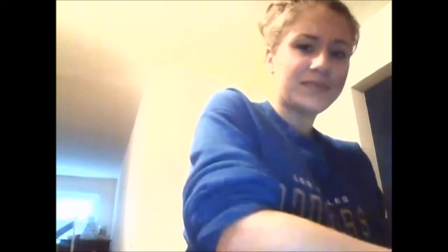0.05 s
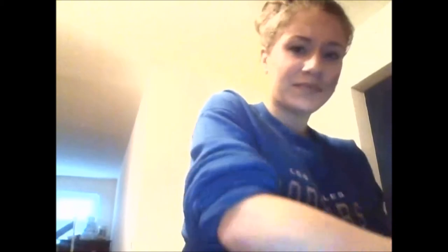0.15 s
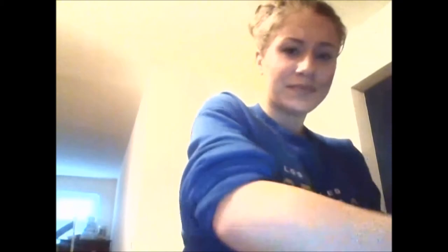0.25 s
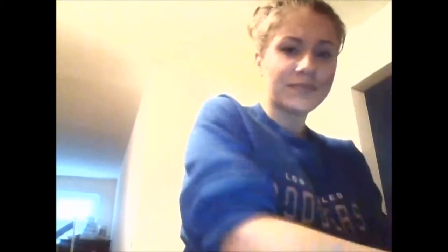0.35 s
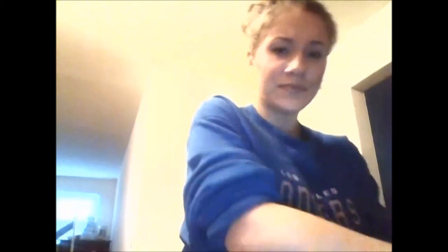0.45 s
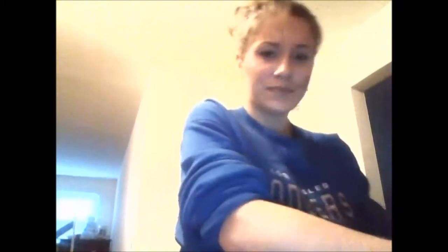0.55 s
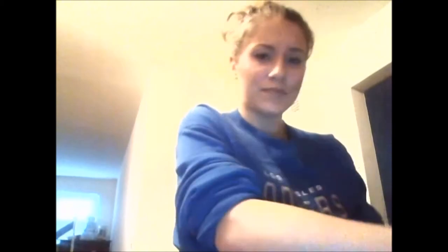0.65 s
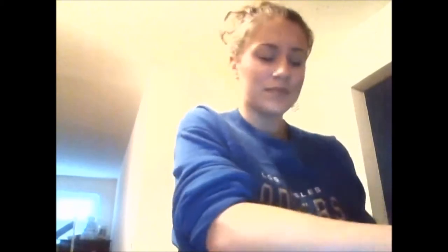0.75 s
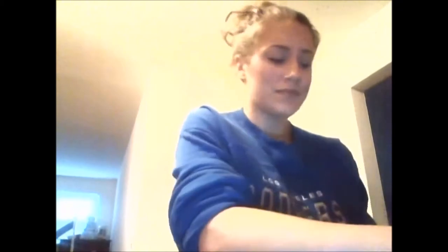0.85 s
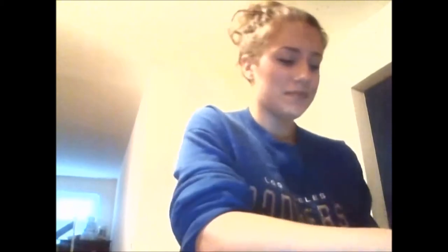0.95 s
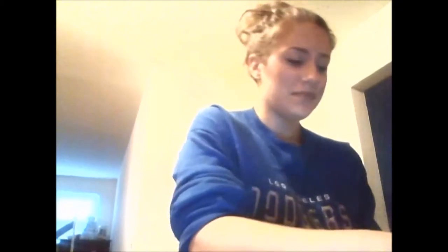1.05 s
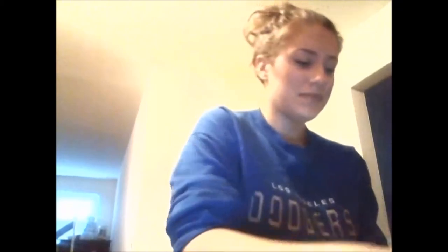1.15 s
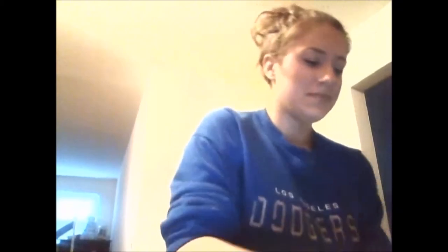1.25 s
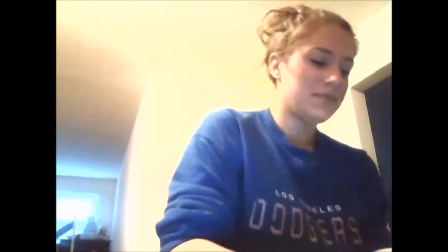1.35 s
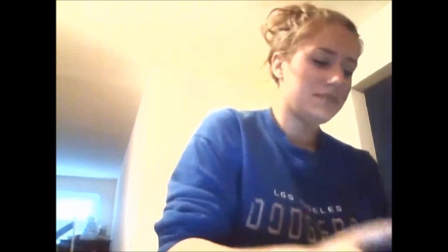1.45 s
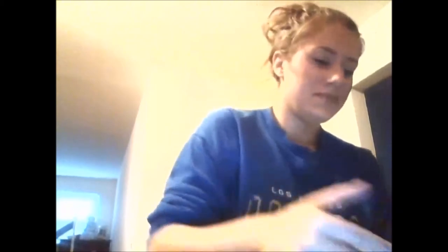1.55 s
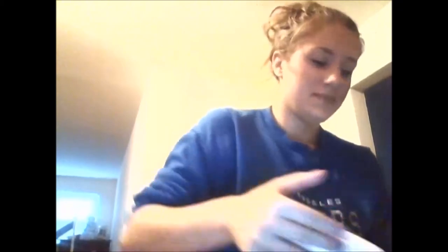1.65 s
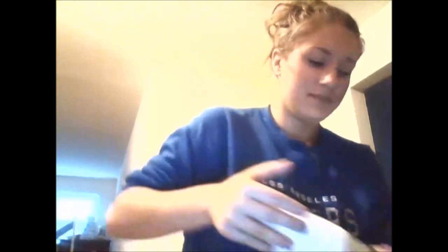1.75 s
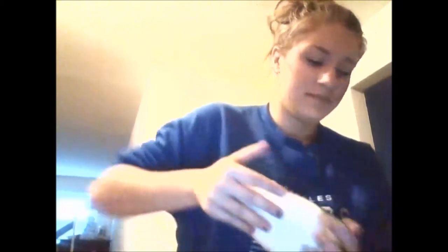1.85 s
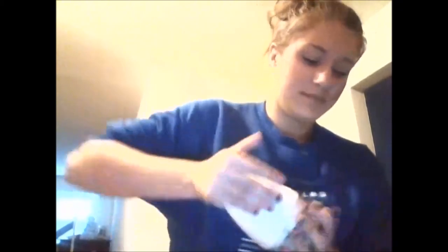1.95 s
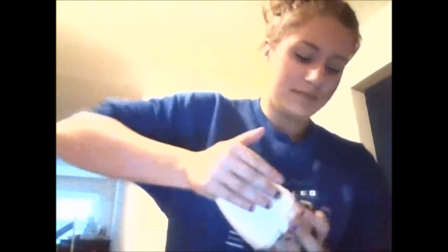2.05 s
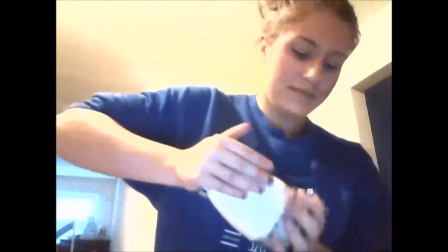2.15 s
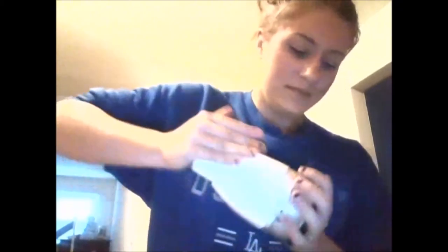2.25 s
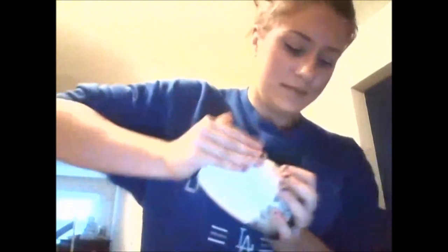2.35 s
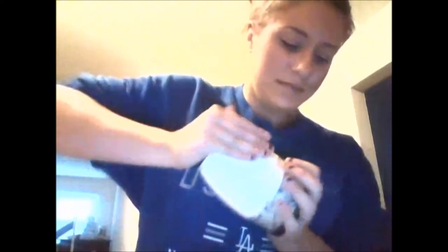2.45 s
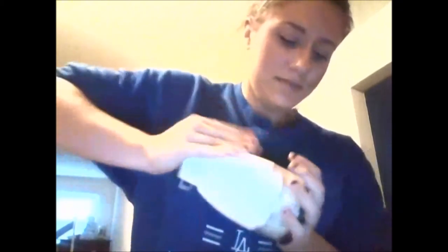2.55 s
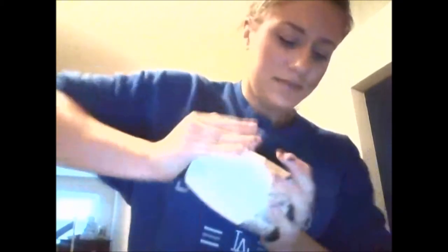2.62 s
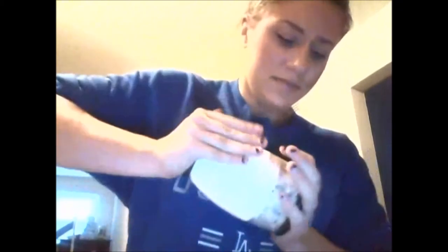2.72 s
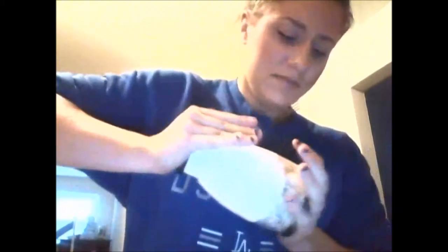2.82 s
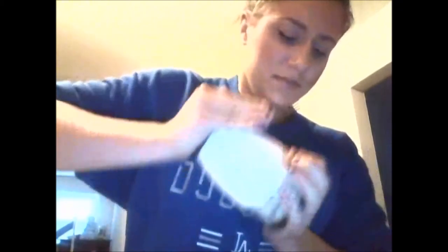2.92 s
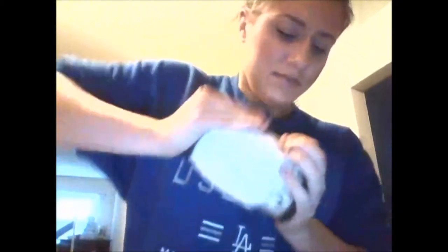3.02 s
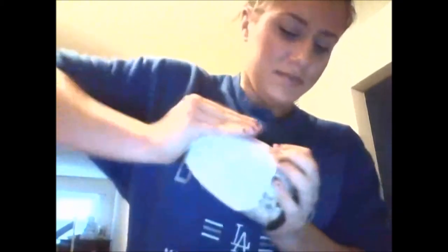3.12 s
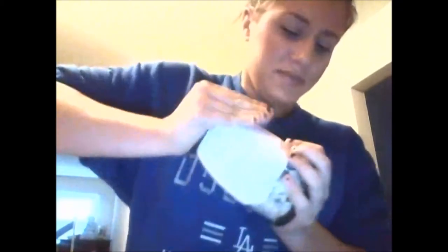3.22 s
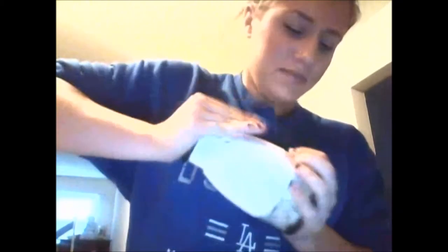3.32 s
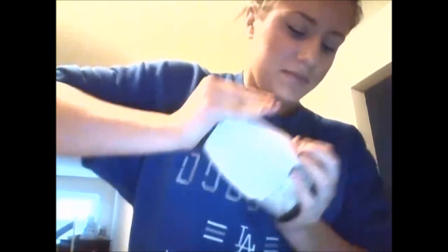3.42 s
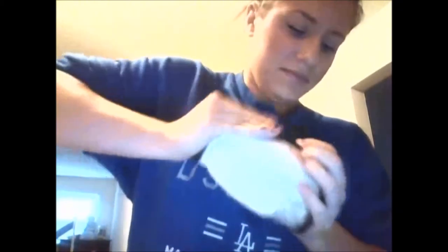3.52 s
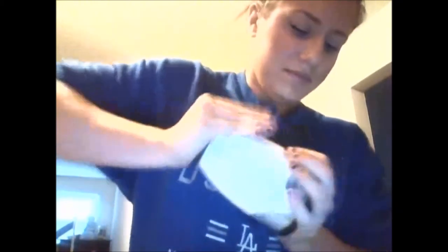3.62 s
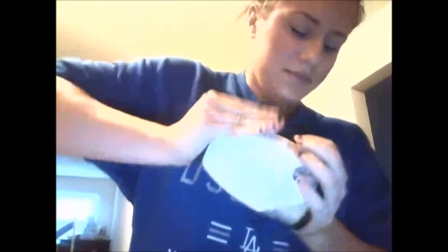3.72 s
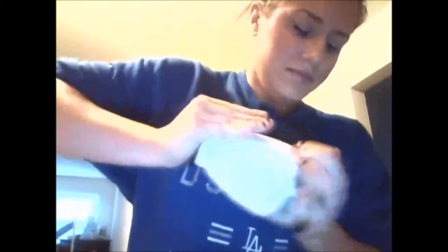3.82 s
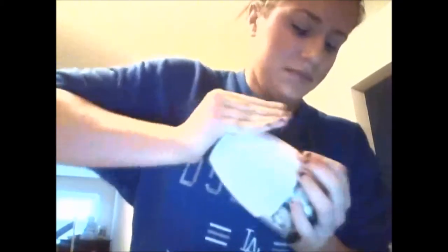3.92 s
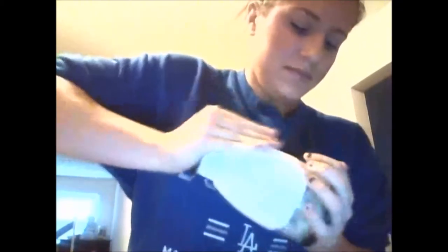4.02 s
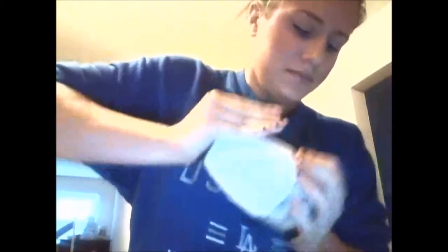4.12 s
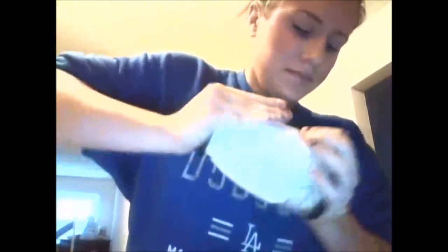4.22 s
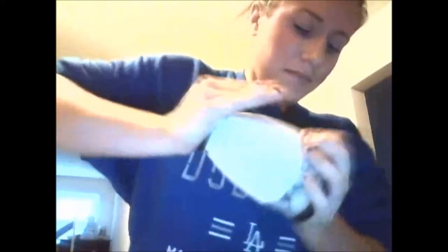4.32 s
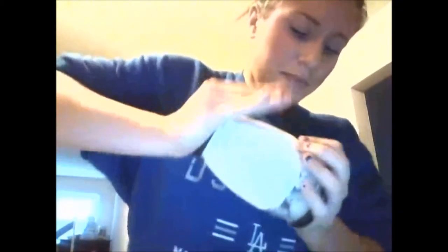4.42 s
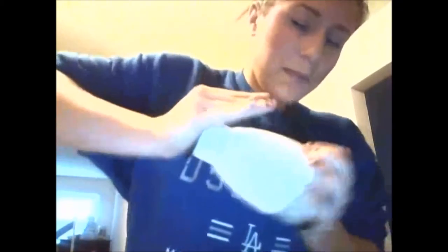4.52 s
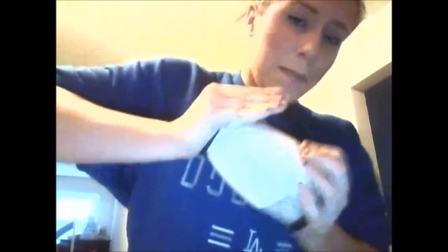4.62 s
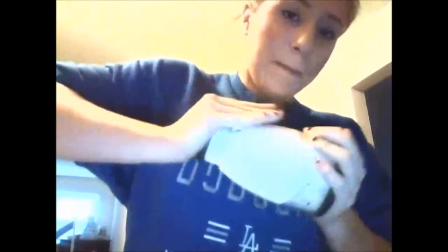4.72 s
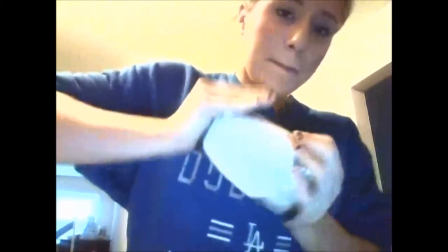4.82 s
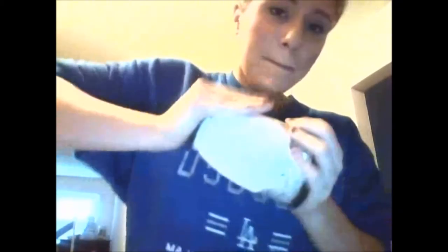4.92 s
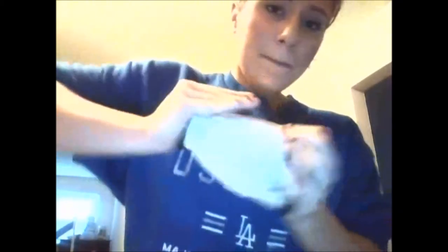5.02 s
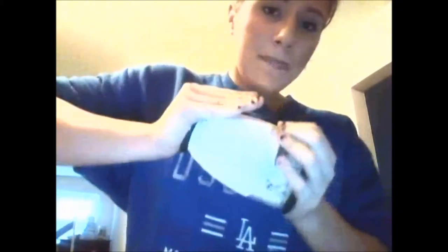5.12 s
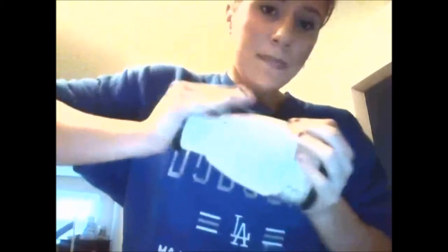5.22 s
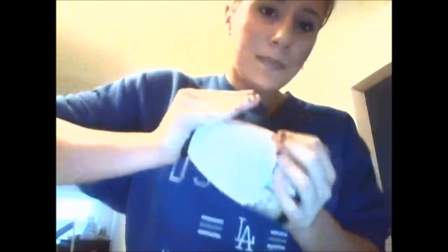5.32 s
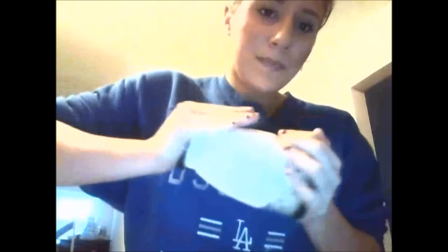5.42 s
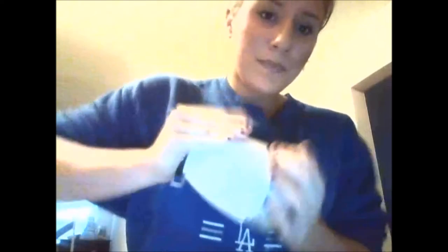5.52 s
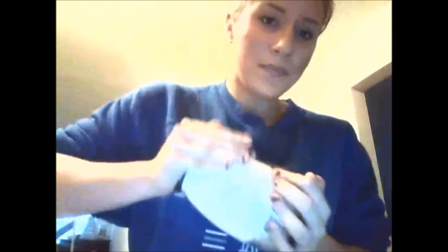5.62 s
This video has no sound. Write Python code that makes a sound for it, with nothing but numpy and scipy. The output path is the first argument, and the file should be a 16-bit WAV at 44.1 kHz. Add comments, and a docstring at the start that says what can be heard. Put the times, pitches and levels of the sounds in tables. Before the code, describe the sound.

A hollow plastic hand chopper is set down, slid closer, then pumped quickly in runs of rattling clacks and gritty scrapes.

```python
"""Vegetable chopper in a small kitchen

A hollow plastic hand chopper is set down, slid to hand and pumped close to the microphone.
Each stroke is a run of chattering clacks that ring shell, head and blades and boom in the cup,
over the gritty scrape of the plunger; twice the palm lands with a thump. A short room tail
answers, and mains hum, faint hiss and a few low counter bumps lie underneath."""
import sys
import numpy as np
from scipy import signal
from scipy.fft import rfft, irfft
from scipy.io import wavfile
from scipy.ndimage import uniform_filter1d

SR = 44100
rng = np.random.default_rng(int(sys.argv[2]) if len(sys.argv) > 2 else 0)


def transcribe(u):
    """Save the signal u as a 16-bit wav file named by the first command-line argument.

    u: samples, shape (n,) or (channels, n), limited to [-1, 1]; the rate is SR.
    q: integer samples, one column per channel.
    """
    v = np.clip(np.atleast_2d(u).T, -1, 1)
    q = np.round(v * 32767).astype(np.int16)
    wavfile.write(sys.argv[1], SR, q)


N = 250047

# colour of the noise floor: (frequency [Hz], relative level [dB])
HISS_SPECTRUM = [(50, -11), (170, -11.5), (280, -26.5), (500, -18), (2000, -51.5), (5000, -35),
                 (15500, -56)]
# low bumps on the counter: (time [s], hold [s], level [dB])
COUNTER_BUMPS = [(0, 0.01, -40), (.3, 0.075, -41), (.72, 0.016, -63)]
# decay of the kitchen: (frequency [Hz], t60 [s])
ROOM_DECAY = [(300, 0.33), (2000, 0.38), (10000, 0.28)]
# bright onset of the slide: (time [s], hold [s], level [dB])
SWISH_SWELL = [(1.21, 0.011, -57)]
# narrow-band tail of the slide: (time [s], hold [s], level [dB])
SLIDE_SWELL = [(1.3, 0.098, -69.5)]
# friction resonances of the slide: (frequency [Hz], width [Hz], level [dB])
SLIDE_MODES = [(4920, 630, 4), (9200, 940, -16)]
# plastic shell: (frequency [Hz], width [Hz], level [dB])
SHELL_MODES = [(1430, 260, -4), (2030, 1370, 0), (2822, 125, -3.5), (3840, 1640, -7)]
# snap of the blades: (frequency [Hz], width [Hz], level [dB])
BLADE_MODES = [(6000, 2060, 10), (8350, 2030, 5), (10200, 6700, -3)]
# boom of the cup's air and wall: (frequency [Hz], width [Hz], level [dB])
CUP_MODES = [(316, 24.8, 10), (401, 100, 1)]
# hollow knock of the plunger head: (frequency [Hz], width [Hz], level [dB])
HEAD_MODES = [(544, 200, -2), (937, 170, 18.5)]
# one rub inside the cup for each movement: (time [s], hold [s], level [dB])
PLUNGER_RUBS = [(0, 0.002, -35.5), (.31, 0.066, -42.5), (.5, 0.3, -63.5), (1.67, 0.056, -67.5),
                (1.93, 0.008, -46.5), (2.3, 0.051, -46), (2.59, 0.12, -59), (2.88, 0.068, -53.5),
                (3.12, 0.024, -48.5), (3.36, 0.02, -45), (3.53, 0.017, -55), (3.62, 0.012, -52.5),
                (3.86, 0.0047, -48), (4.07, 0.04, -50.5), (4.32, 0.003, -43), (4.55, 0.0053, -43),
                (4.79, 0.014, -48.5), (5.04, 0.0057, -50), (5.27, 0.0024, -47.5), (5.51, 0.0017, -44.5)]
# palm blows as the plunger bottoms out: (time [s], level [dB], pitch [Hz])
PALM_BLOWS = [(3.382, -17.5, 443), (3.868, -24, 587)]
# hits inside the chopper: (time [s], level [dB], cup boom trim [dB], head knock trim [dB],
# blade snap trim [dB], chatter t60 [s])
CLACK_HITS = [(0.251, -23.5, -12, -8, -8, 0.038), (0.291, -13, -22, -3.5, -14, 0.05),
              (0.364, -27, 2, -10, -9.5, 0.089), (0.404, -37, -21, -19, 3, 0.034),
              (0.502, -35.5, -36, -30, -14.5, 0.12), (0.602, -22, -44, -56, 2, 0.028),
              (0.703, -28.5, -40, 3, -9, 0.068), (1.207, -44.5, 21, 17, -28, 0.0084),
              (1.226, -39, -55, -27, -17.5, 0.033), (1.3, -40.5, -12, -36, -50, 0.04),
              (1.337, -42.5, -33, 6, -1, 0.017), (1.392, -45.5, -32, -14, -26, 0.041),
              (1.502, -45.5, -8, -11, -38, 0.035), (1.577, -31, 2.5, -2, -27, 0.023),
              (1.623, -43, -7, -20, -26, 0.026), (1.754, -42, 3, -14, -18, 0.046),
              (1.913, -29, -17.5, -19, -14, 0.039), (1.979, -32.5, 0, -31, -16.5, 0.13),
              (2.103, -36, -55, -43, -20.5, 0.019), (2.237, -23.5, -43, 0.5, -9.5, 0.053),
              (2.287, -25.5, -2, -7, -22, 0.027), (2.331, -27, -33, -15, -13, 0.047),
              (2.348, -24, -8, -15, -24, 0.083), (2.388, -32, -46, -25, -14, 0.042),
              (2.502, -34, -21, -8, -30, 0.21), (2.525, -31, 9, -24, -11, 0.039),
              (2.598, -26, -37, -29, -13, 0.025), (2.608, -22.5, -30, -9, -5, 0.1),
              (2.624, -21, -2, -26, -15.5, 0.043), (2.718, -36.5, -29, -20, -1, 0.019),
              (2.763, -36, -4.5, -9, -15, 0.17), (2.851, -30.5, -29, -20, -11, 0.087),
              (2.868, -24, -1.5, 2.5, -21, 0.092), (2.879, -13, -6.5, -8, -12.5, 0.033),
              (3.033, -36, -23, -6.5, -16, 0.047), (3.047, -33, 4.5, -12, -12, 0.072),
              (3.117, -26, -44, -39, -27, 0.016), (3.13, -23.5, -22, 13, 7, 0.057),
              (3.145, -21.5, -19, -22, -20, 0.034), (3.256, -38.5, -30, -20, -2, 0.015),
              (3.292, -30, -30, -8, -19, 0.094), (3.313, -22, -17, 6.5, -2.5, 0.051),
              (3.358, -27.5, -24, 0, -25, 0.0094), (3.363, -26, -33, -37, -20, 0.13),
              (3.381, -14.5, -33, -5.5, -8.5, 0.041), (3.412, -26, -27, -18, 13, 0.017),
              (3.489, -37, -25, -31, -6, 0.019), (3.518, -36.5, -23, -15, 2, 0.015),
              (3.524, -28.5, -9, -5.5, -19.5, 0.11), (3.598, -34.5, -32, -2, -41, 0.042),
              (3.614, -22.5, -46, 1, -4, 0.029), (3.628, -17, -40, -4.5, -10, 0.031),
              (3.745, -37.5, 2, -3, 1, 0.032), (3.787, -19.5, -5, -11, -18, 0.059),
              (3.84, -33, -33, -1, -37, 0.042), (3.859, -22.5, -10.5, -19, -10.5, 0.095),
              (3.885, -27.5, -5, -5, -11, 0.037), (3.975, -31.5, -49, -24, 12, 0.028),
              (3.993, -34.5, -10, -15, -19, 0.12), (4.008, -25.5, -29, -31, -16, 0.051),
              (4.07, -20.5, -51, -48, -23.5, 0.035), (4.085, -25, -12, -6, -9, 0.059),
              (4.1, -24.5, 0.5, 3.5, -10.5, 0.042), (4.234, -23.5, -1.5, -35, -14.5, 0.031),
              (4.309, -22, -7, -45, -13.5, 0.033), (4.343, -24.5, -6, -34, -18, 0.025),
              (4.452, -40, -26, -18, -26, 0.079), (4.478, -24.5, -2.5, -14, -12, 0.051),
              (4.523, -15.5, -1.5, -17, -10, 0.035), (4.552, -22, -14, -16, -11, 0.049),
              (4.567, -26.5, -20, -14, -15, 0.044), (4.576, -22.5, 1.5, -24, -19, 0.053),
              (4.728, -29, -7, -1.5, -17, 0.082), (4.778, -30.5, -30, -14, -22, 0.039),
              (4.794, -24.5, -20, -24, -14, 0.032), (4.809, -28.5, 0, -5, -15, 0.057),
              (4.935, -37, -12, -34, -5, 0.033), (4.956, -27.5, -18, 2.5, -27, 0.036),
              (4.99, -36.5, -33, -18, -24, 0.036), (5.023, -38, -4, -5, -32, 0.09),
              (5.048, -23, -32, -22, -21.5, 0.036), (5.059, -24.5, -22, -27, -18, 0.055),
              (5.197, -27, -1, -5, -9, 0.069), (5.251, -27.5, 2, -14, -15.5, 0.062),
              (5.288, -28, -12, -29, -13, 0.096), (5.303, -25.5, -3.5, -37, -26, 0.038),
              (5.42, -35.5, 6, -12, -12.5, 0.04), (5.487, -26, 4, 1, -20, 0.072),
              (5.502, -22, -46, -39, -19, 0.025), (5.532, -25, 2.5, -32, -12, 0.03),
              (5.657, -31.5, -30, -30, -20, 0.46)]
# treble roll-off of the microphone: (frequency [Hz], gain [dB])
MIC_RESPONSE = [(7000, 0.5), (11000, -4.5), (14000, -14)]


def gain_of(db):
    return 10 ** (np.asarray(db) / 20)


def unit_rms(x):
    return x / np.sqrt(np.mean(x ** 2) + 1e-20)


def unit_peak(x):
    return x / (abs(x).max() + 1e-20)


def unit_energy(x):
    return x / np.linalg.norm(x)


def curve_at(points, hz):
    """Reads a curve on a log-frequency axis."""
    point_hz, value = np.transpose(points)
    return np.interp(np.log(hz + 1), np.log(point_hz + 1), value)


def equalise(x, curve):
    """Colours a full-length track with a (frequency [Hz], gain [dB]) curve."""
    return irfft(rfft(x) * gain_of(curve_at(curve, np.fft.rfftfreq(N, 1 / SR))), N)


def add(mix, start_s, sound):
    part = mix[round(start_s * SR):][:len(sound)]
    part += sound[:len(part)]


def swells(rows, rise_db_per_s, fall_db_per_s, rest_db=-np.inf):
    """Envelope on a resting level: each swell climbs until its time, holds, then falls."""
    t, envelope = np.arange(N) / SR, np.full(N, gain_of(rest_db))
    for time_s, hold_s, db in rows:
        before, after = np.maximum(time_s - t, 0), np.maximum(t - time_s - hold_s, 0)
        envelope += gain_of(db - rise_db_per_s * before - fall_db_per_s * after)
    return envelope


def ring(modes, detune=1, lift_db=0):
    """Damped modes answering a tap; a mode's level sets the height of its resonance."""
    hz, width, db = np.transpose(modes)[:, :, None]
    t = np.arange(4096) / SR
    decay = gain_of(db + lift_db) * width * np.exp(-np.pi * width * t)
    return (decay * np.sin(2 * np.pi * hz * detune * t)).sum(0)


def chatter(count, spread_db):
    """Tiny contacts of random sign, a few of them large."""
    return rng.standard_normal(count) * gain_of(spread_db * np.minimum(rng.exponential(1, count), 5))


def spurts(count, depth_db, smooth_samples):
    """A wandering gain that breaks a texture into clumps."""
    return gain_of(depth_db * unit_rms(uniform_filter1d(rng.standard_normal(count), smooth_samples)))


def mains_hum(hz=62, rms_db=-68):
    """One steady low sine."""
    return np.sqrt(2) * gain_of(rms_db) * np.sin(2 * np.pi * hz * np.arange(N) / SR)


def hiss(level_db=-75):
    """A steady noise bed, levelled by its part above 200 Hz."""
    noise = equalise(rng.standard_normal(N), HISS_SPECTRUM)
    upper = signal.sosfilt(signal.butter(4, 200, "high", fs=SR, output="sos"), noise)
    return gain_of(level_db) * noise / upper.std()


def counter_bumps():
    """Bumps on the counter reach the microphone as short swells of rumble."""
    rumble = equalise(rng.standard_normal(N), [(12, -21.5), (40, -5), (70, -7), (210, -18), (500, -60.5)])
    return swells(COUNTER_BUMPS, rise_db_per_s=347, fall_db_per_s=163, rest_db=-84) * unit_rms(rumble)


def kitchen_reverb(x):
    """Sparse reflections of random sign, each band dying at its own speed."""
    taps = np.zeros(SR // 2)
    slots = np.arange(150, len(taps) - 12, 12)
    taps[slots + rng.integers(0, 12, len(slots))] = rng.choice([-1., 1.], len(slots))
    hz, t, spectrum = signal.stft(taps, SR, nperseg=256)
    decay = gain_of(-60 * t / curve_at(ROOM_DECAY, hz)[:, None])
    tail = signal.istft(spectrum * decay, SR, nperseg=256)[1]
    return signal.fftconvolve(x, unit_energy(tail))[:N]


def low_thud(chopper):
    """Sub-bass drawn from the chopper's envelope trails every burst of work."""
    return signal.sosfilt(signal.butter(2, [20, 60], "band", fs=SR, output="sos"), abs(chopper))


def slide():
    """Soft friction as the chopper is slid to hand: a bright swish, then two narrower bands."""
    bright = unit_rms(np.diff(rng.standard_normal(N + 2), 2))
    resonant = signal.oaconvolve(rng.standard_normal(N + 1), ring(SLIDE_MODES))[:N + 1]
    swish = swells(SWISH_SWELL, rise_db_per_s=200, fall_db_per_s=200) * bright
    tail = swells(SLIDE_SWELL, rise_db_per_s=61, fall_db_per_s=61) * unit_rms(np.diff(resonant))
    return swish + tail


def plunger_scrape():
    """Plunger and cut pieces rub in the cup: clumps of dense grit ring every part."""
    body = (ring(SHELL_MODES) + gain_of(-10) * ring(HEAD_MODES)
            + gain_of(-17) * ring(BLADE_MODES) + gain_of(-2.5) * ring(CUP_MODES))
    grit = spurts(N, depth_db=3.7, smooth_samples=300) * chatter(N, spread_db=4.1)
    envelope = swells(PLUNGER_RUBS, rise_db_per_s=249.5, fall_db_per_s=227, rest_db=-78)
    return envelope * unit_rms(signal.oaconvolve(grit, body)[:N])


def palm_thumps():
    """Each blow is a couple of heavily damped swings of the whole body."""
    out, t = np.zeros(N), np.arange(1024) / SR
    for time_s, db, hz in PALM_BLOWS:
        cycles = hz * t
        swing = cycles * np.exp(-1.8 * cycles) * np.sin(2 * np.pi * cycles)
        add(out, time_s, gain_of(db) * unit_peak(swing))
    return out


def clacks():
    """Each clack is a dying chatter that rings shell, head and blades, plus a shove that booms the cup."""
    out, t = np.zeros(N), np.arange(3072) / SR
    shove = unit_energy(np.gradient(np.exp(-((t - 0.0015) / 0.00038) ** 2)))
    soft_plastic = signal.butter(2, 5500, fs=SR, output="sos")  # swallows the top end
    for time_s, db, boom_db, knock_db, snap_db, t60 in CLACK_HITS:
        cup_detune = 1 + 0.031 * rng.standard_normal((len(CUP_MODES), 1))  # pieces shift inside
        boom = gain_of(boom_db) * signal.fftconvolve(shove, ring(CUP_MODES, cup_detune))

        attack_s = 0.001 + 0.033 * t60  # long grinding contacts start more softly
        envelope = (1 - np.exp(-t / attack_s)) * gain_of(-60 * t / t60)
        envelope *= spurts(len(t), depth_db=2.72, smooth_samples=90)  # loose parts rattle

        grip = 1 + 0.058 * rng.standard_normal((len(SHELL_MODES), 1))  # the hand detunes the modes
        spot_db = 8.9 * rng.standard_normal((len(SHELL_MODES), 1))  # each spot favours other modes
        shell_ring = signal.sosfilt(soft_plastic, ring(SHELL_MODES, grip, spot_db))
        head_ring = ring(HEAD_MODES, grip[:len(HEAD_MODES)], spot_db[:len(HEAD_MODES)] / 2)
        blade_ring = ring(BLADE_MODES, grip[:len(BLADE_MODES)], spot_db[:len(BLADE_MODES)] / 2)

        contacts = envelope * chatter(len(t), spread_db=3.06)
        blade_contacts = envelope ** 1.3 * chatter(len(t), spread_db=2.8)
        shell = signal.fftconvolve(unit_energy(contacts), shell_ring)
        knock = gain_of(knock_db) * signal.fftconvolve(unit_energy(envelope * contacts), head_ring)
        snap = gain_of(snap_db) * signal.fftconvolve(unit_energy(blade_contacts), blade_ring)
        add(out, time_s, gain_of(db) * unit_peak(shell + knock + snap + boom))
    return out


def scene():
    """Mono mix: the chopper up front, with room tail and sub-bass, over the quiet bed."""
    low_cut = signal.butter(2, 240, "high", fs=SR, output="sos")  # a small object radiates little bass
    chopper = signal.sosfilt(low_cut, clacks() + palm_thumps() + plunger_scrape() + slide())
    room = gain_of(-12.5) * kitchen_reverb(chopper)
    thud = gain_of(-13.5) * low_thud(chopper)
    bed = counter_bumps() + hiss() + mains_hum()
    return (chopper + room + thud + bed)[None]


def record(dry):
    """A noise suppressor ducks quiet stretches, the microphone dulls the treble, a steep cut tops it."""
    threshold_db, max_duck_db, high_cut_hz = -54, 8, 15600
    power_db = 10 * np.log10(abs(uniform_filter1d(dry ** 2, 2500)) + 1e-12)
    duck_db = np.clip(0.65 * (power_db - threshold_db), -max_duck_db, 0)
    ducked = dry * gain_of(uniform_filter1d(duck_db, 1200))
    high_cut = signal.firwin(511, high_cut_hz, window=("kaiser", 9), fs=SR)
    return signal.oaconvolve(equalise(ducked, MIC_RESPONSE), high_cut[None], "same")


dry = scene()
out = record(dry)
transcribe(out)
```